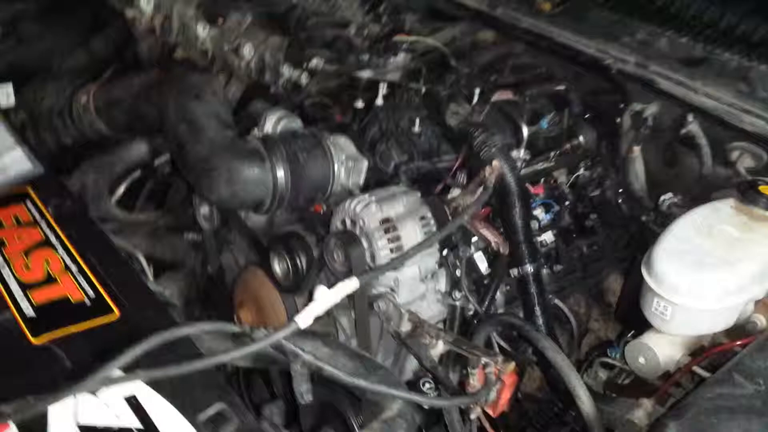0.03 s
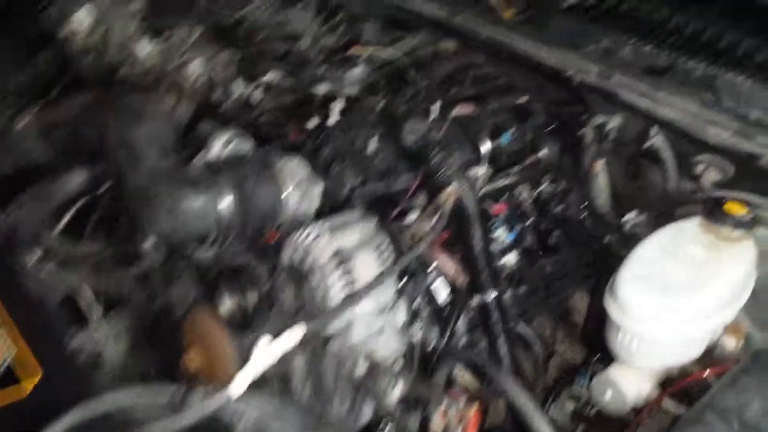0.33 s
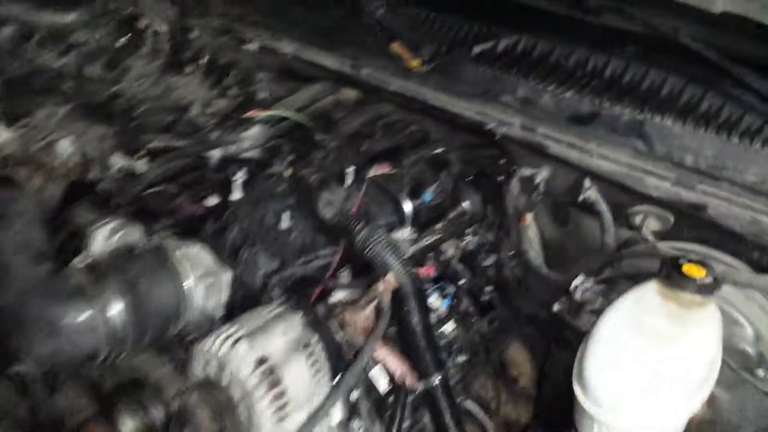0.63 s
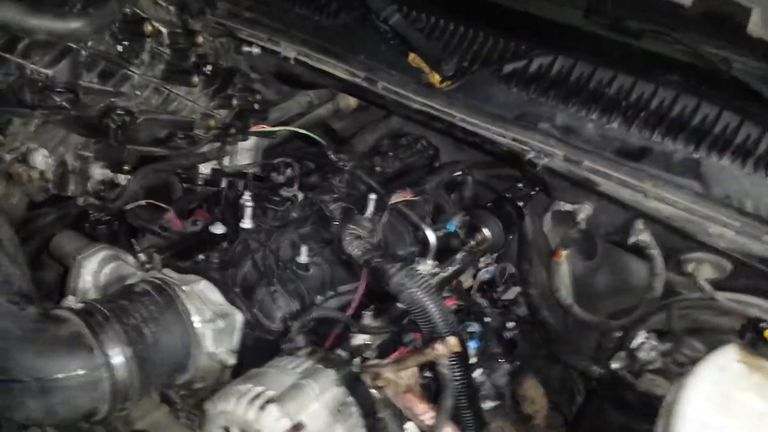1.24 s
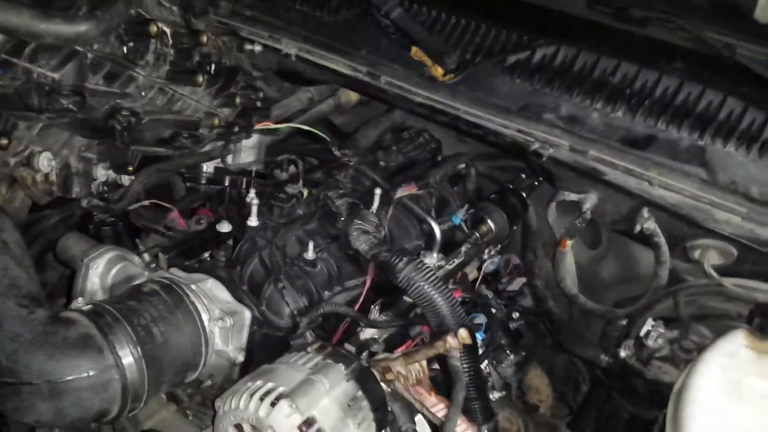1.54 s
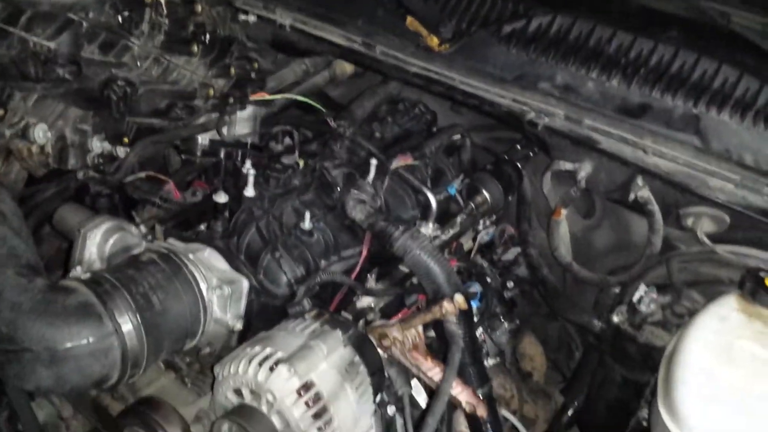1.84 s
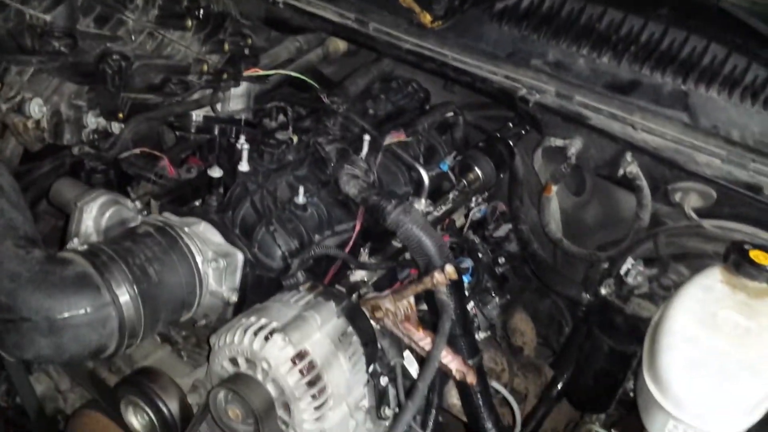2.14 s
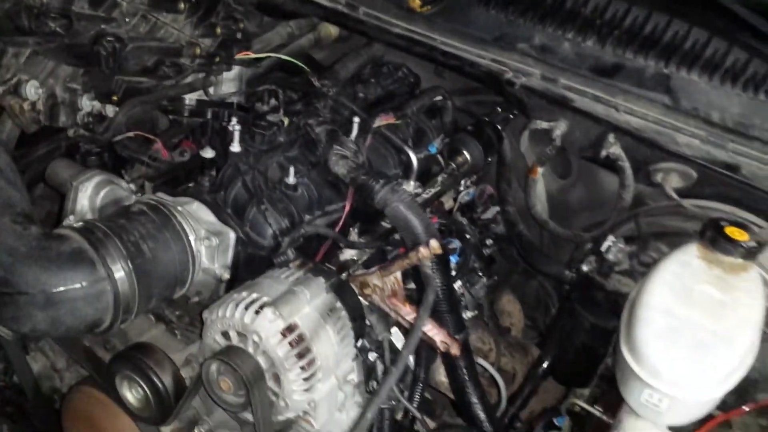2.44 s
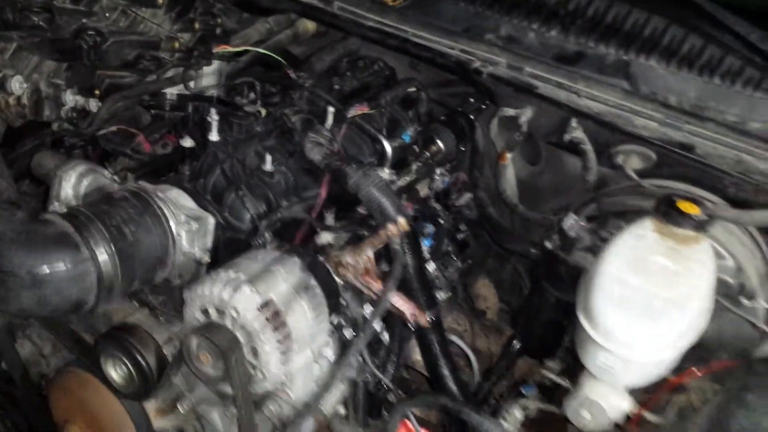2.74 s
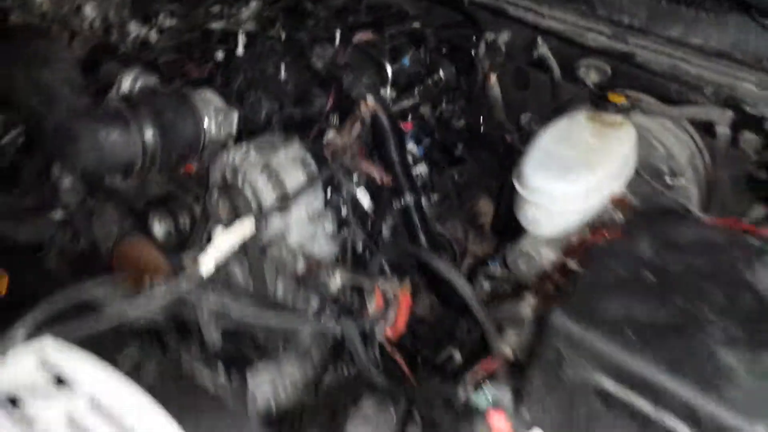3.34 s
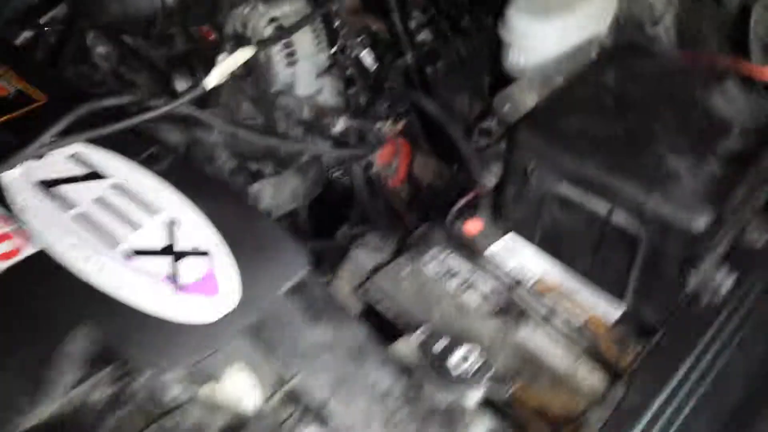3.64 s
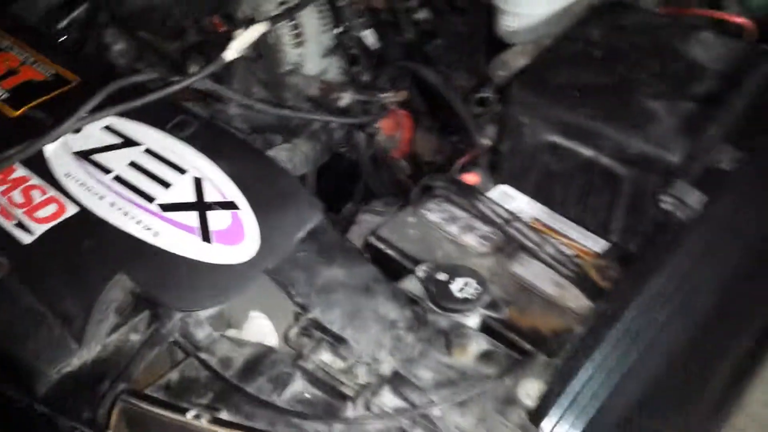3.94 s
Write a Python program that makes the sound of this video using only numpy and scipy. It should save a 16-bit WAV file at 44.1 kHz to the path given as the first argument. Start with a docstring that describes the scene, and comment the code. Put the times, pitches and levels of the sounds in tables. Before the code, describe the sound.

A V8 engine idles with a lumpy rumble and sharp valve ticking, heard close up.

```python
"""Lumpy V8 at idle

A V8 with a lumpy cam idles near 980 rpm, heard from a microphone moving just above the open engine bay.
Its firings lope in a pattern of sixteen: each thumps in the exhaust, knocks in the block, rings the covers
and rattles the valve train. Belt and fan whirr; loose tappets tick above the rest. The sound fades in."""
import sys
import numpy as np
from scipy import signal
from scipy.fft import rfft, irfft, next_fast_len
from scipy.io import wavfile
from scipy.ndimage import map_coordinates

SR = 44100
rng = np.random.default_rng(int(sys.argv[2]) if len(sys.argv) > 2 else 0)


def persist_wave(psi):
    """Save psi, clipped to +-1, as 16-bit WAV."""
    counts = np.round(np.clip(psi, -1, 1) * 32767).astype(np.int16)
    wavfile.write(sys.argv[1], SR, np.atleast_2d(counts).T)


N = 176400
TIME_S = np.arange(N) / SR


def amp(db):
    """Decibels to gain."""
    return 10 ** (np.asarray(db) / 20)


def unit_rms(x):
    """x at rms 1."""
    return x / np.sqrt(np.mean(x ** 2) + 1e-20)


def curve_at(points, hz):
    """Interpolate (frequency, value) points on a log axis."""
    knots_hz, values = np.transpose(points)
    return np.interp(np.log(hz + 1), np.log(knots_hz + 1), values)


def wobble(knots_per_s):
    """Smooth random curve."""
    return map_coordinates(rng.standard_normal(4000), [TIME_S * knots_per_s], mode="mirror")


def filtered(x, response):
    """x through a complex frequency response."""
    size = next_fast_len(N + SR // 2)
    return irfft(rfft(x, size) * response(np.fft.rfftfreq(size, 1 / SR)), size)[..., :N]


def resonate(x, spectrum, size=16384):
    """x through a minimum-phase body with this spectrum."""
    cepstrum = irfft(np.log(amp(curve_at(spectrum, np.fft.rfftfreq(size, 1 / SR)))))
    cepstrum[1:size // 2] *= 2
    cepstrum[size // 2 + 1:] = 0
    return signal.fftconvolve(x, irfft(np.exp(rfft(cepstrum))))[:N]


def impulses(times_s, gains):
    """Weighted impulse train."""
    return np.bincount(np.clip(times_s * SR, 0, N).astype(int), gains, N + 1)[:N]


def bursts(times_s, gains, rise_s, decay_s):
    """Envelope of bursts that swell and die, summed in power."""
    t = np.arange(SR // 4) / SR
    shape = np.minimum(t / rise_s, 1) * np.exp(-np.maximum(t - rise_s, 0) / decay_s)
    power = signal.fftconvolve(impulses(times_s, gains ** 2), shape ** 2)[:N]
    return np.sqrt(np.abs(power))


def chatter(decay_s, contacts_per_s=1100, spread_db=2.5, count=8000):
    """Envelope of tiny, uneven metal contacts."""
    times_s = np.cumsum(rng.exponential(size=count)) / contacts_per_s
    gains = amp(spread_db * np.clip(rng.standard_normal(count), -2, 2))
    return unit_rms(bursts(times_s, gains, 1 / SR, decay_s))


# Left-right likeness (frequency [Hz], correlation [0..1])
STEREO_CORRELATION = [(100, 1), (250, 0.96), (700, 0.94), (1400, .4), (2800, 0.34), (5000, 0),
                      (12000, 0.11)]


def shaped_noise(spectrum, envelope):
    """Stereo noise at rms 1, shaped by an envelope, then a spectrum."""
    def mid_side(hz):
        angle = np.arccos(np.clip(curve_at(STEREO_CORRELATION, hz), -1, 1)) / 2
        return amp(curve_at(spectrum, hz)) * [np.cos(angle), np.sin(angle)]
    mid, side = filtered(envelope * rng.standard_normal((2, N)), mid_side)
    return unit_rms(np.array([mid + side, mid - side]))


# Start of each lope (time [s])
LOPE_STARTS_S = [0.352, .599, .842, 1.091, 1.337, 1.581, 1.828, 2.077, 2.325, 2.563, 2.804, 3.048, 3.29,
                 3.534, 3.785, 4.029]
# Firings of one lope (exhaust thump [dB], block knock [dB], cover ring [dB], valve clatter [dB])
LOPE_PATTERN = [(1.5, -1, -1.5, 4.5), (2.5, 8.5, 5, 10), (-26, -6.5, 2, 7.5), (4.5, 3.5, -2, 2),
                (-14.5, -2.5, 7, 8), (-16.5, -6.5, 5.5, 8), (-5, 7.5, -3.5, 0.5), (-15, -12.5, 5, 8),
                (0.5, -5, 7, 5.5), (1.5, 3, 4.5, 5.5), (-1, -14.5, 1.5, 7), (3, 3.5, -3, 4),
                (0.5, -4, 6.5, 3), (1, 4, 4, 7.5), (-11.5, -6.5, 5, 8), (-7.5, -5.5, 8.5, 6)]


def firings(pattern_db, scatter_db, jitter_s=0.0003):
    """Time and gain of every firing; no two lopes are quite alike."""
    per_lope = len(LOPE_PATTERN)
    index = np.arange(per_lope * (len(LOPE_STARTS_S) - 1))
    time_error, level_error = rng.standard_normal((len(index), 2)).T
    times_s = np.interp(index / per_lope, np.arange(len(LOPE_STARTS_S)), LOPE_STARTS_S)
    gains = amp(pattern_db[index % per_lope] + scatter_db * level_error)
    return times_s + jitter_s * time_error, gains


def bay_reflections(x, t60_s=0.038, wet_db=0.5, change_s=0.02):
    """Treble bounces between engine, firewall and hood; the paths change as the microphone moves."""
    t = np.arange(SR // 10) / SR
    hop = round(change_s * SR)
    wet = np.zeros((2, N + len(t)))
    for start in range(0, N, hop):
        tail = rng.standard_normal((2, len(t))) * amp(-60 * t / t60_s) * (t > 0.001)
        tail /= np.linalg.norm(tail, axis=1, keepdims=True)
        echo = signal.fftconvolve(x[:, start:start + hop], tail, axes=1)
        wet[:, start:start + echo.shape[1]] += echo

    def wet_ratio(hz):
        return amp(wet_db) * np.clip((hz - 1500) / 2500, 0, 1)
    direct = filtered(x, lambda hz: 1 / np.hypot(1, wet_ratio(hz)))
    return direct + filtered(wet[:, :N], lambda hz: wet_ratio(hz) / np.hypot(1, wet_ratio(hz)))


def belt_and_fan():
    """Even whirr, with the same treble shape as the valves."""
    spectrum = [(100, -43), (450, -9), (1100, -9)] + list(VALVE_SPECTRUM)[2:]
    return amp(-27) * shaped_noise(spectrum, envelope=1)


# Cover and panel resonances (frequency [Hz], level [dB])
COVER_SPECTRUM = [(400, -9.5), (580, -11), (660, 1), (760, -0.5), (830, -4.5), (910, -2), (1000, -17),
                  (1200, -14.5), (1700, -35), (5000, -80)]
PANEL_SPECTRUM = [(600, -9.5), (820, -16), (910, 0), (1040, -4.5), (1200, -12.5), (1500, -35), (4000, -70)]
# Panel ring as the listening angle changes (time [s], level [dB])
PANEL_LEVELS = [(.5, 6.5), (.9, -2), (1.3, -24), (2.4, -9), (3, 4.5), (3.4, 1), (4, 5.5)]


def sheet_metal(pattern_db, cover_db):
    """Firings ring the covers and a tinny panel."""
    times_s, gains = firings(pattern_db, scatter_db=1)
    shake = bursts(times_s - 0.002, gains, rise_s=0.0058, decay_s=0.029)
    panel_db = np.interp(TIME_S, *np.transpose(PANEL_LEVELS))
    covers = amp(-29 + cover_db) * shaped_noise(COVER_SPECTRUM, shake)
    panel = amp(-37 + panel_db) * shaped_noise(PANEL_SPECTRUM, shake)
    return covers + panel


# Block resonances (frequency [Hz], level [dB])
BLOCK_SPECTRUM = [(120, -26), (190, 2), (228, 2), (255, -6), (310, -1.5), (385, -8), (440, -17.5),
                  (560, -18.5), (900, -53), (3000, -90)]


def engine_block(pattern_db):
    """Firings knock dully in the block."""
    knocks = bursts(*firings(pattern_db, scatter_db=0.85), rise_s=0.0031, decay_s=0.019)
    return amp(-29) * shaped_noise(BLOCK_SPECTRUM, knocks)


# Valve clatter and rocker ring (frequency [Hz], level [dB])
VALVE_SPECTRUM = [(620, -13.5), (1050, -1), (1430, -5), (1800, -1), (2500, -1), (3500, -6), (4200, -6),
                  (5200, -6), (6300, -1), (6800, -2), (8000, -7), (9700, -10), (12000, -15.5), (14500, -21)]
ROCKER_SPECTRUM = [(1200, -17), (1900, -22.5), (2200, 2), (2370, -8), (2475, 4.5), (2570, 2), (2690, -1),
                   (2900, 0), (3500, -11), (6000, -61)]


def valve_train(pattern_db, valve_db, rocker_db):
    """Valves clatter and rockers ring with every firing."""
    strokes = bursts(*firings(pattern_db, scatter_db=2.33), rise_s=0.0077, decay_s=0.037)
    valves = shaped_noise(VALVE_SPECTRUM, strokes * chatter(decay_s=0.001))
    rockers = shaped_noise(ROCKER_SPECTRUM, strokes * chatter(decay_s=0.0035))
    return amp(-27 + valve_db) * valves + amp(-33 + rocker_db) * rockers


# Loud ticks (time [s], level [dB])
TAPPET_TICKS = [(0.583, -10.5), (0.628, -6), (.676, -9), (0.715, -7.5), (.754, -11), (.829, -10),
                (.921, -6), (1.073, -10.5), (1.167, -7.5), (1.32, -7.5), (1.412, -8), (1.456, -8),
                (1.521, -8), (1.609, -1.5), (1.657, -5), (1.814, -6.5), (1.858, -3), (2.04, -9.5),
                (2.063, -10), (2.088, -7.5), (2.105, -8.5), (2.15, -17), (2.262, -8.5), (2.35, -5),
                (2.394, -10), (2.511, -8.5), (2.534, -12), (2.592, -2.5), (2.75, -7), (2.792, -9.5),
                (2.834, -9.5), (3.12, -10.5), (3.318, -6.5), (3.363, -11), (3.473, -7.5), (3.565, -9.5),
                (3.611, -9.5), (3.818, -7.5), (3.863, -10)]
# Tappet contact (frequency [Hz], level [dB])
TAPPET_SPECTRUM = [(600, -30), (1500, -34), (2800, -2), (4200, -9), (6000, -2), (7500, 3), (9600, 1),
                   (11500, -8), (15000, -22)]


def tappets(rise_s=0.0059, decay_s=0.015):
    """Loose tappets: each tick is a short, bright spray of contacts."""
    times_s, levels_db = np.transpose(TAPPET_TICKS)
    spray = shaped_noise(TAPPET_SPECTRUM, chatter(decay_s=0.0034))
    return amp(-15.5) * spray * bursts(times_s - rise_s / 2, amp(levels_db), rise_s, decay_s)


# Exhaust orders (multiple of the lope rate [1], level [dB])
DRONE_ORDERS = [(16, -24), (17, -30), (21, -31.5), (22, -19.5), (23, -30.5), (31, -21.5), (32, -23.5),
                (34, -21.5), (37, -29), (55, -35.5), (56, -37)]


def exhaust_drone(waver_db=1, wander_rad=0.2):
    """The strongest orders of the exhaust hum as slightly wavering tones."""
    lopes = np.interp(TIME_S, LOPE_STARTS_S, np.arange(len(LOPE_STARTS_S)))
    drone = np.zeros(N)
    for order, level_db in DRONE_ORDERS:
        peak = np.sqrt(2) * amp(level_db + waver_db * wobble(5))
        drone += peak * np.cos(2 * np.pi * round(order) * lopes + wander_rad * wobble(3.79))
    return drone


# Pipe response to pulses and to puffs (frequency [Hz], level [dB])
PIPE_SPECTRUM = [(30, -49), (52, -30), (64, -15.5), (78, -11.5), (92, -15.5), (105, -8.5), (130, -0.5),
                 (160, 4.5), (185, -18), (215, -16.5), (300, -25), (500, -51.5), (1500, -88), (4000, -120)]
PUFF_SPECTRUM = [(20, -45), (45, -40), (66, -8), (100, -8), (118, -4), (132, 1), (150, -2), (168, -4),
                 (205, -19.5), (300, -28), (500, -51), (2000, -100)]


def exhaust(pattern_db, puff_exponent=0.61):
    """Each firing sends a pulse and a turbulent puff down the pipe, over the drone."""
    times_s, gains = firings(pattern_db, scatter_db=0.8)
    thumps = unit_rms(resonate(impulses(times_s - 0.005, gains), PIPE_SPECTRUM))
    flow = bursts(times_s - 0.006, gains ** puff_exponent, rise_s=0.0038, decay_s=0.0051)
    puffs = shaped_noise(PUFF_SPECTRUM, flow)
    return amp(-16) * thumps + amp(-16.5) * puffs + exhaust_drone()


# Levels along the microphone's path
# (time [s], exhaust [dB], block [dB], covers [dB], valves and whirr [dB], rockers [dB])
PATH_LEVELS = [(.5, -1, 0.5, -4.5, 0, 0.5), (.8, -1.5, 4.5, 1.5, .5, 0.5), (1.15, 2, 0.5, 0.5, 0.5, 1.5),
               (1.45, -1, 3.5, 1.5, 0, 0), (1.7, -1.5, 3.5, 1.5, 1.5, 3.5), (1.95, 1, 3, 1, -0.5, 2),
               (2.3, 0.5, 1.5, 0, 1, 2), (2.55, -4.5, 2, 1, -0.5, 1.5), (2.85, -2, 2, -1.5, -1.5, -2),
               (3.15, -0.5, -1.5, -1, 0, 3), (3.55, -0.5, 2.5, -1.5, -1, -5.5), (4, -2, 6.5, -6, -0.5, -19)]


def scene():
    """The exhaust below and the machinery close by."""
    thump_db, knock_db, ring_db, clatter_db = np.transpose(LOPE_PATTERN)
    path_s, *columns = np.transpose(PATH_LEVELS)
    exhaust_db, block_db, cover_db, valve_db, rocker_db = [np.interp(TIME_S, path_s, c) for c in columns]
    body = amp(exhaust_db) * exhaust(thump_db)
    body += amp(block_db) * engine_block(knock_db)
    body += sheet_metal(ring_db, cover_db)
    machinery = valve_train(clatter_db, valve_db, rocker_db) + amp(valve_db) * belt_and_fan() + tappets()
    return body + bay_reflections(machinery)


# Colour of the two microphone ports (frequency [Hz], left minus right [dB])
PORT_BALANCE = [(400, -0.5), (520, -5), (700, -1.5), (920, -0.5), (1200, -3), (1700, -5.5), (2600, -5),
                (4100, -2), (5000, 0), (6400, 9), (8000, 0.5), (9600, -6.5), (12000, -13), (14500, -40)]


def record(dry, even_below_hz=220, left_lag_s=0.00009, start_s=0.42, fade_s=0.069, top_hz=14650):
    """Two unlike microphone ports, a fade-in, soft overload and a band limit."""
    def ports(hz):
        half_each_way = np.array([[0.5], [-0.5]])
        gains = amp(curve_at([(even_below_hz, 0)] + list(PORT_BALANCE), hz) * half_each_way)
        lag = np.exp(-2j * np.pi * hz * left_lag_s * half_each_way)  # left port is further away
        return lag * gains / np.sqrt(np.mean(gains ** 2, axis=0))
    faded = filtered(dry, ports) * np.clip((TIME_S - start_s) / fade_s, 0, 1)
    limited = faded / (1 + np.abs(faded / 0.95) ** 10) ** (1 / 10)
    return filtered(limited, lambda hz: np.clip((top_hz - hz) / 200 + 0.5, 0, 1))


dry = scene()
out = record(dry)
persist_wave(out)
```